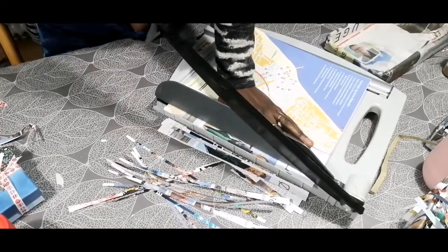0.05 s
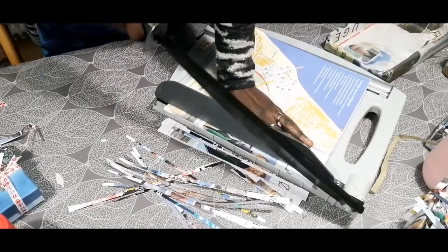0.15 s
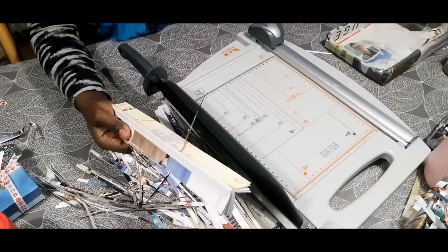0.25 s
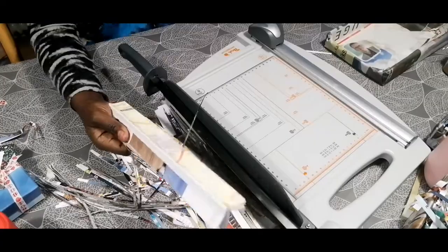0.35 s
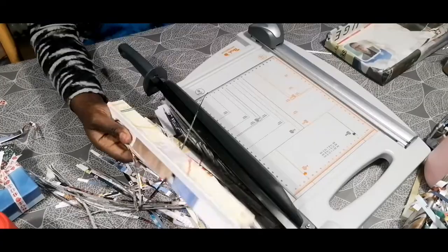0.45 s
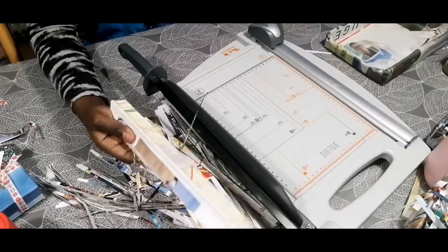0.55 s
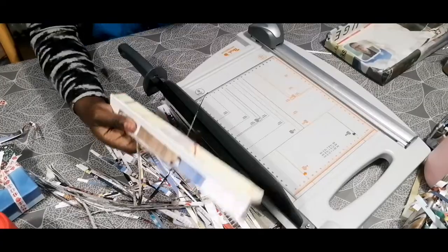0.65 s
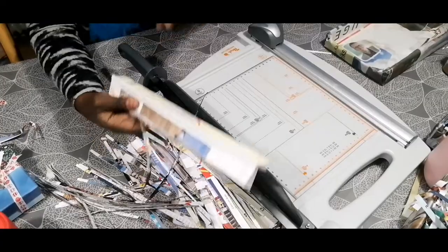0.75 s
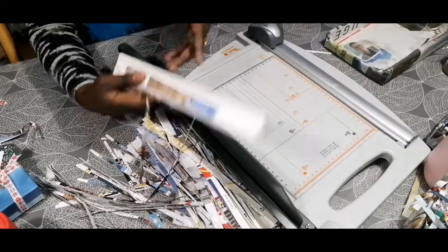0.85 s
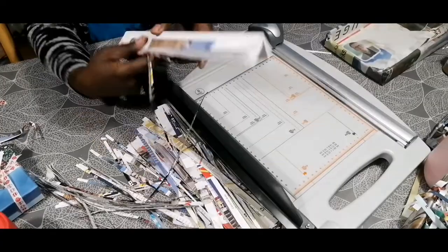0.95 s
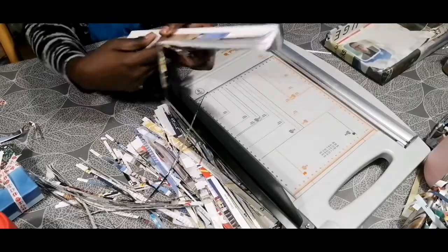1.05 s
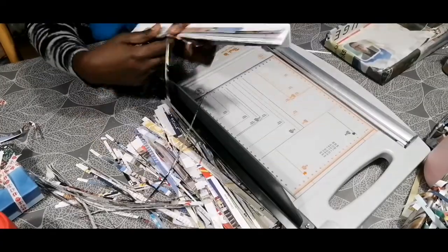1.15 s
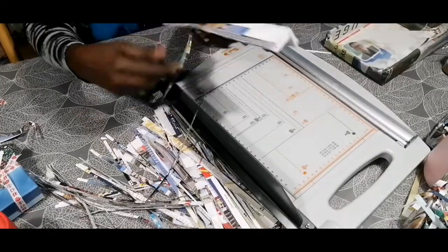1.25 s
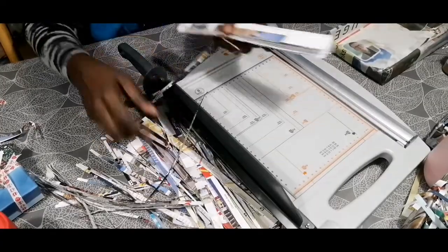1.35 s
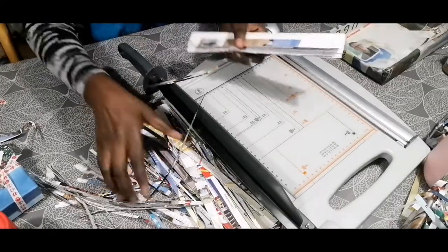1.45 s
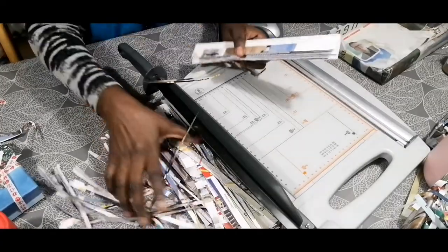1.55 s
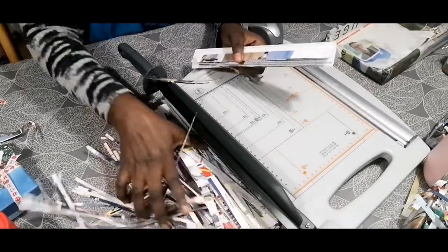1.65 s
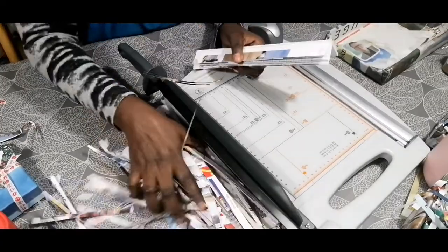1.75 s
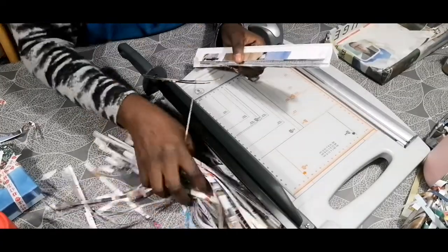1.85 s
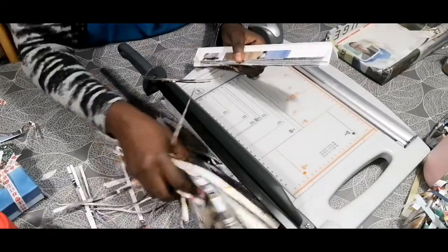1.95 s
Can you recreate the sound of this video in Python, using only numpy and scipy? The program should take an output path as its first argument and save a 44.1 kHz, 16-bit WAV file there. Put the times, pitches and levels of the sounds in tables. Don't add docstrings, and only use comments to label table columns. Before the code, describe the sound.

A paper cutter blade crunches through a stack of pages, then knocks and crisp paper rustling

```python
import sys
import numpy as np
from scipy import signal
from scipy.io import wavfile

SR = 44100
rng = np.random.default_rng(int(sys.argv[2]) if len(sys.argv) > 2 else 0)


def unload_audio(sound):
    columns = np.transpose(np.atleast_2d(sound))
    steps = np.round(np.clip(columns, -1, 1) * 32767)
    wavfile.write(sys.argv[1], SR, steps.astype(np.int16))


def ratio(d):
    e = np.asarray(d, float) / 20
    return 10 ** e


N = 88200
SCENE_CHANGE_S, FADE_S = 0.4837, 0.0094
PORT_HZ = 7100


def rms_one(x):
    return x / np.sqrt(np.mean(x ** 2) + 1e-20)


def in_time(rows):
    s, *columns = np.transpose(rows)
    return [np.interp(np.arange(N) / SR, s, c) for c in columns]


def at_hz(points, hz):
    point_hz, value = np.transpose(points)
    return np.interp(np.log(hz), np.log(point_hz), value)


def butter(x, order, hz, kind="low"):
    return signal.sosfilt(signal.butter(order, hz, kind, fs=SR, output="sos"), x)


def resonance(x, hz, q):
    return signal.lfilter(*signal.iirpeak(hz, q, fs=SR), x)


def dying(start_s, t60_s):
    t = np.arange(N) / SR - start_s
    return (t > 0) * ratio(-60 * np.maximum(t, 0) / t60_s)


def drift(rate_hz):
    r = np.exp(-80 * np.pi * rate_hz / SR)
    white = rng.standard_normal(N // 40 + 2002)
    slow = signal.lfilter([1], [1, -2 * r, r * r], white)[2000:]
    return np.interp(np.arange(N) / 40, np.arange(len(slow)), rms_one(slow))


def grains(rate_per_s, smooth):
    born = rng.random((2, 1, N)) < rate_per_s * ratio(3.0 * drift(25)) / SR
    sizes = born * ratio(3.0 * np.minimum(rng.exponential(1, (2, 1, N)), 3.0))
    return rng.standard_normal((2, 2, N)) * np.sqrt(smooth ** 2 + rms_one(sizes) ** 2)


# frequency_hz, likeness [-1 to 1]
COHERENCE = [(60, 0.21), (180, 0.24), (550, 0.53), (1650, 0.024), (4970, 0.013), (15000, -0.22)]


def coloured(white, spectrum, patchy_db, tilt_db=0):
    first_hz, last_hz = spectrum[0][0], spectrum[-1][0]
    count = 3 * int(np.log2(last_hz / first_hz)) + 3
    edges = np.geomspace(first_hz, min(last_hz, 17500), count)
    out = 0
    for k, (low, high) in enumerate(zip(edges, edges[1:])):
        mid, side = butter(white[k % 2], 2, [low, high], "band")
        hz = np.sqrt(low * high)
        alike = np.clip(at_hz(COHERENCE, hz), -1, 1)
        gain = ratio(at_hz(spectrum, hz) + patchy_db * drift(15.6) + tilt_db * np.log2(hz / PORT_HZ))
        out = out + gain * (np.sqrt(1 + alike) * mid + np.sqrt(1 - alike) * side * [[1], [-1]])
    return rms_one(out)


def ring(force, hz, t60_s, blows):
    r, w = ratio(-60 / (t60_s * SR)), 2 * np.pi * hz / SR
    kept = 0.61
    parts, state = [], np.zeros((2, 2))
    for part in np.split(force + 1e-18, blows, axis=1):
        rung, state = signal.lfilter([0, np.sin(w)], [1, -2 * r * np.cos(w), r * r], part, zi=state * kept)
        parts.append(rung)
    return np.concatenate(parts, axis=1)


# frequency_hz, side_to_mid_db
BODY_SIDE = [(60, -9.5), (240, -6.5), (950, -5.5), (3770, -14), (15000, 1)]


def strike(modes, hits, spread_db, cut_hz, chatter):
    s, db, tilt_db = np.transpose(hits)
    at = (s * SR).astype(int)
    out = np.zeros((2, N))
    for k, (hz, level_db, t60_s) in enumerate(modes):
        force = chatter * rng.standard_normal((2, N))
        draw = rng.standard_normal((len(s), 2))
        blow_db = db + tilt_db * np.log2(hz / 300)
        force[0, at] += ratio(blow_db + spread_db * draw[:, 0])
        force[1, at] += ratio(blow_db) * draw[:, 1]
        polarity = -1 if k % 2 or hz < 450 else 1
        mid, side = ring(force, hz, t60_s, np.sort(at)) * ratio(level_db) * polarity
        out += mid + ratio(at_hz(BODY_SIDE, hz) - 4.5) * side * [[1], [-1]]
    lag_s = 0.00011
    out[0] = np.interp(np.arange(N) - lag_s * SR, np.arange(N), out[0])
    return butter(out, 4, cut_hz, "high")


def snaps(rows):
    t = np.arange(SR // 4) / SR
    out = np.zeros((2, N + SR))
    noise = rng.standard_normal((len(rows), 2, len(t)))
    for (s, db, pan_db, hz, t60_s), (mid, side) in zip(rows, noise):
        click = 1.07 * (t == 0)
        burst = (mid + 0.64 * side * [[1], [-1]]) * ratio(-60 * t / t60_s) + click
        broad = butter(butter(burst, 1, 900, "high"), 2, min(1.14 * hz, SR * .45))
        pitched = 5.74 * np.sqrt(PORT_HZ / hz) * resonance(burst, hz, 8.8)
        gain = ratio(db - 12.5 + np.array([[pan_db], [-pan_db]]) / 2)
        start = int(s * SR)
        out[:, start:start + len(t)] += (broad + pitched) * gain
    return out[:, :N]


# time_s, level_db
AIR_GAIN = [
    (0, -59),
    (.6, -61.5),
    (.85, -55.5),
    (1.4, -63.5),
    (1.65, -61.5),
    (2, -68),
]
# frequency_hz, density_db [dB per Hz]
AIR_SPECTRUM = [(15, 3.5), (25, 1.5), (258, -14), (338, -14.5), (963, -23.5), (1040, -20), (1480, -35),
                (2970, -28.5), (15300, -44)]


def room_air():
    white = rng.standard_normal((2, 2, N))
    return ratio(in_time(AIR_GAIN)[0]) * coloured(white, AIR_SPECTRUM, 5.5)


# time_s, crackle_db, sheet_relative_db, brightness_db_per_octave
HANDLING = [(.485, -51, -6, 5.5), (.53, -64, -4.5, 5), (.68, -68, -11, 7), (.86, -60.5, -2, -1),
            (.93, -58.5, -15, 4.5), (1.04, -60, -4.5, 1.5), (1.2, -59.5, -3, 4), (1.215, -45.5, -22, 3),
            (1.28, -56, -9, 4), (1.289, -56, 3.5, 0), (1.4, -68.5, 2, 6), (1.48, -69.5, -5, 1.5),
            (1.5, -51, -58, 5.5), (1.6, -50, -20.5, 10), (1.69, -47, -3.5, 6.5), (1.77, -44, -8.5, 7.3),
            (1.81, -38.5, -12, 7.5), (2, -39, -10, 4)]
# frequency_hz, density_db [dB per Hz]
EDGE_SPECTRUM = [(880, -81), (1500, -21), (3050, -2.5), (4000, -4.5), (5200, -4.5), (5960, -10),
                 (7170, -6.5), (9230, -17), (15300, -29)]
# frequency_hz, density_db [dB per Hz]
SHEET_SPECTRUM = [(180, -44.5), (300, -13), (370, -31), (440, -4), (2200, -2), (2860, -5), (4840, -120)]


def rustle():
    crackle_db, sheet_db, tilt_db = in_time(HANDLING)
    after = np.arange(N) / SR > SCENE_CHANGE_S - FADE_S
    crackle = coloured(grains(3000, 1.0), EDGE_SPECTRUM, 1.5, tilt_db) * ratio([[.6], [-.6]])
    sheets = coloured(grains(1400, 1.07), SHEET_SPECTRUM, 0.87) * ratio(sheet_db)
    return after * ratio(crackle_db) * (crackle + sheets)


# start_s, peak_db, left_right_db, pitch_hz, t60_s
CREASES = [(.874, -60, -2, 2490, 0.0082), (.8895, -33.5, 12, 6900, 0.0055), (.8905, -33.5, 8, 3300, 0.013),
           (.987, -33, 10.5, 6700, 0.0039), (1.005, -46, 3, 6200, .03), (1.028, -49, 4, 5940, .005),
           (1.033, -39, 9, 4940, 0.022), (1.065, -43, 9, 3500, 0.0073), (1.068, -34, 8, 3700, 0.013),
           (1.072, -34, 0, 5140, 0.0067), (1.206, -34.5, -6, 2870, 0.036),
           (1.2085, -31.5, -9, 3130, 0.0061), (1.2095, -26, 4.5, 7560, 0.014), (1.288, -47, 0, 1100, 0.093),
           (1.487, -57, 14, 7100, 0.019), (1.508, -57, -2, 384, .2), (1.61, -60, 0, 540, .2),
           (1.612, -52, 0, 253, 0.19), (1.702, -49, -2, 375, .4), (1.495, -42.5, 11, 3110, 0.013),
           (1.517, -49, 8, 6960, 0.021), (1.547, -37, 8, 6500, 0.012), (1.586, -53, -19, 7360, .015),
           (1.622, -36.5, 9, 6470, .015), (1.697, -36.5, -8, 640, 0.036), (1.721, -27, 9, 3530, 0.0041),
           (1.724, -43, 18, 14500, .04), (1.762, -35.5, 4, 790, 0.024), (1.794, -26, -5, 7300, 0.011),
           (1.8415, -22, 7, 1920, 0.0087), (1.842, -28.5, 9, 7750, 0.022), (1.852, -30, 8, 11300, .008),
           (1.902, -28, 6, 12500, 0.011), (1.937, -25.5, 11, 7350, 0.011), (1.974, -26, -2, 7200, 0.0081)]


def creases():
    return snaps(CREASES)


SLAP_S, SLAP_DB = 1.057, -37
# frequency_hz, density_db [dB per Hz]
SLAP_SPECTRUM = [(880, -31), (1500, -12.5), (2430, -8.5), (3470, 2), (4090, -4.5), (5100, -1.5),
                 (10500, -52), (15000, -47)]


def slap():
    rise_s, t60_s = 0.0016, 0.47
    shape = dying(SLAP_S, t60_s) - dying(SLAP_S, rise_s * 7)
    return ratio(SLAP_DB) * shape * coloured(grains(1300, 1.8), SLAP_SPECTRUM, 2.8)


# start_s, peak_db, brightness_db_per_octave
STACK_KNOCKS = [
    (.585, -53, -4.5),
    (.76, -54.5, -5),
    (.8, -75, 3),
    (1.055, -42, -4),
    (1.064, -37.5, -8),
    (1.084, -36, -10.5),
    (1.095, -32, -6.5),
    (1.152, -34.5, -4.5),
    (1.19, -40.5, -1.5),
]
# frequency_hz, level_db, t60_s
TABLE_MODES = [(39.8, -16, 0.15), (83.7, -4.5, 0.14), (114.7, -3, .16), (174, -4, 0.076),
               (250, -11.5, 0.087), (387, -12.5, 0.074), (620, -17, 0.12), (656, -6, 0.036),
               (906, -17.5, 0.032)]


def table_knocks():
    shudder = ratio(SLAP_DB - 17) * dying(SLAP_S, 0.39)
    table = strike(TABLE_MODES, np.add(STACK_KNOCKS, [0, -4, 0]), 1.5, 67, shudder)
    return butter(table, 1, 690)


# start_s, peak_db, brightness_db_per_octave
HAND_BUMPS = [(0.579, -66.5, -8), (0.832, -55.5, -10), (1.287, -48, 1), (1.292, -49.5, -9),
              (1.3, -58.5, -20), (1.315, -66, 10), (1.328, -70, -1), (1.347, -63, -3), (1.377, -61.5, 1),
              (1.506, -60, -10), (1.608, -54.5, -4)]
# frequency_hz, level_db, t60_s
BOARD_MODES = [(116, -42.5, 0.72), (148.7, -13.5, 0.15), (206, -20, 0.22), (266.3, -5.5, 0.12),
               (327, -9.5, 0.04), (374.2, -2.5, 0.19), (396, -16.5, 0.05), (594, -12, 0.037),
               (644, -13.5, 0.07), (743.6, -13.5, 0.1), (806, -12.5, 0.069), (930.6, -9.5, 0.095),
               (1060, -37, 0.038), (1168, -20.5, 0.07)]


def board_bumps():
    drag = ratio(np.minimum(in_time(HANDLING)[0], -46) - 43.5) * (np.arange(N) > 1.5 * SR)
    tremble = sum(ratio(db - 24.5) * dying(s, 0.26) for s, db, _ in HAND_BUMPS)
    damped = np.multiply(BOARD_MODES, [1, 1, 0.56])
    return strike(damped, HAND_BUMPS, 1.5, 120, drag + tremble)


# time_s, board_db, hiss_relative_db
BLADE_STROKE = [
    (.07, -44, -10.5),
    (.12, -34, -13),
    (.2, -35, -7),
    (.28, -25, -12.5),
    (.345, -24, -16),
    (.41, -20, -16.5),
    (.445, -20, -22),
    (.475, -21, -20),
]
# start_s, peak_db, brightness_db_per_octave
BLADE_SLIPS = [(0.075, -25, 1), (0.083, -28, -3), (0.099, -25, -8), (0.126, -17, -9.5), (0.139, -24, -3),
               (0.147, -24, 3), (0.159, -18, -0.8), (0.169, -37, 9.5), (0.189, -23, 8), (0.209, -22, 5),
               (0.229, -18.5, 6), (0.257, -20, -16), (0.272, -12, -4), (0.3118, -12, 2.2), (0.365, -9, 0),
               (0.377, -12.5, 4.5), (0.399, -5.5, -3.5), (0.41, -5, 0.5), (0.418, -15, -9),
               (0.427, -35, 11), (0.436, -6, -2.5), (0.446, -19, 3), (0.456, -15, -4.5), (0.464, -24, -3)]
# start_s, peak_db, left_right_db, pitch_hz, t60_s
FIBRE_TEARS = [(.075, -45, 11, 7100, 0.047), (.088, -45.5, 11, 2110, 0.047), (.153, -35, 5, 5200, 0.023),
               (.184, -32.5, 2, 5560, 0.025), (.229, -32, 0, 5400, 0.03), (.31, -26.5, 7, 2130, 0.038),
               (.311, -38, 3, 7000, .02), (.352, -32, 4, 7100, .02), (.374, -36, 9, 7000, 0.014),
               (.388, -31.5, 2, 7000, 0.0088), (.399, -34, 8, 2200, 0.028), (.417, -43, -6, 7000, .01),
               (.435, -32, 2, 5350, 0.017), (.453, -31.5, 9, 5200, 0.017), (.474, -41.5, -10, 6700, 0.03)]
# frequency_hz, density_db [dB per Hz]
SHEAR_SPECTRUM = [(760, 7.5), (1300, -2.5), (2180, -2), (2410, -2.5), (2820, -4.5), (4260, -7),
                  (7280, -8.5), (8590, -11.5), (15300, -26)]


def cut():
    t = np.arange(N) / SR
    board_db, hiss_db = in_time(BLADE_STROKE)
    on = t > BLADE_STROKE[0][0]
    small_slips = (rng.random(N) < 620 / SR) * ratio(board_db - 10) * on
    board = strike(BOARD_MODES, np.add(BLADE_SLIPS, [0, -10.5, 0]), 2.0, 130, small_slips)
    board = butter(board, 2, 1430)
    cracks = sum(ratio(db - 41) * dying(s, 0.011) for s, db, _ in BLADE_SLIPS)
    shear = coloured(grains(1300, 1.08), SHEAR_SPECTRUM, 1.5)
    hiss = (ratio(board_db + hiss_db) * on + cracks) * shear
    return (board + hiss + snaps(FIBRE_TEARS)) * np.clip((SCENE_CHANGE_S - t) / FADE_S, 0, 1)


def scene():
    return room_air() + rustle() + creases() + slap() + table_knocks() + board_bumps() + cut()


def top_cut(x):
    return signal.sosfilt(signal.butter(12, 16430, fs=SR, output="sos"), x)


def record(dry):
    port = resonance(dry, PORT_HZ, PORT_HZ / 720)
    dip = 0.6 * resonance(dry, 4110, 4110 / 1220)
    edge = resonance(dry, 15800, 15800 / 500) * [[1.23], [0.36]]
    low_pass = signal.cheby2(16, 50, 15800, fs=SR, output="sos")
    mix = signal.sosfilt(low_pass, dry + port + edge - dip)
    return top_cut(mix)


dry = scene()
out = record(dry)
unload_audio(out)
```